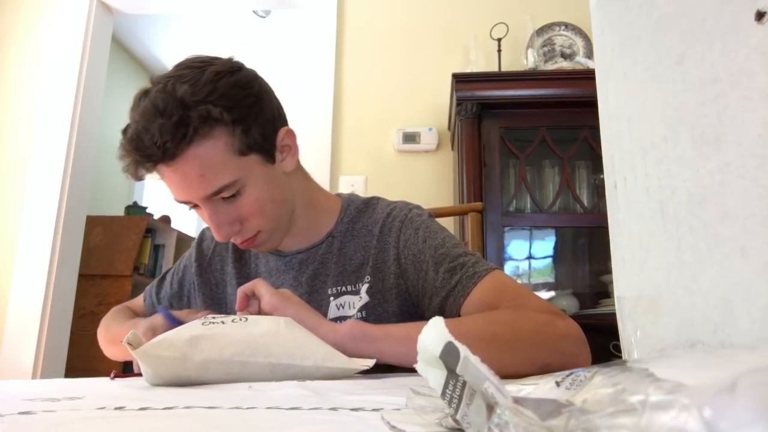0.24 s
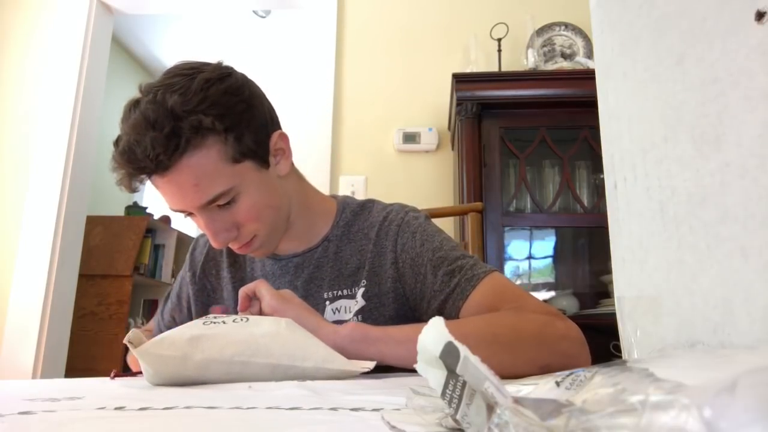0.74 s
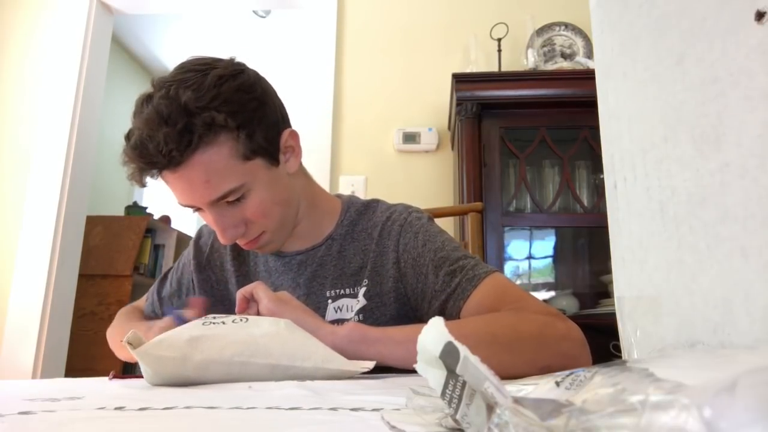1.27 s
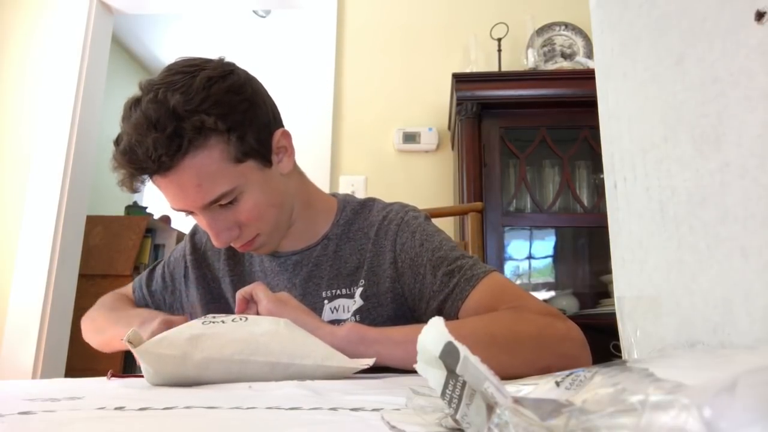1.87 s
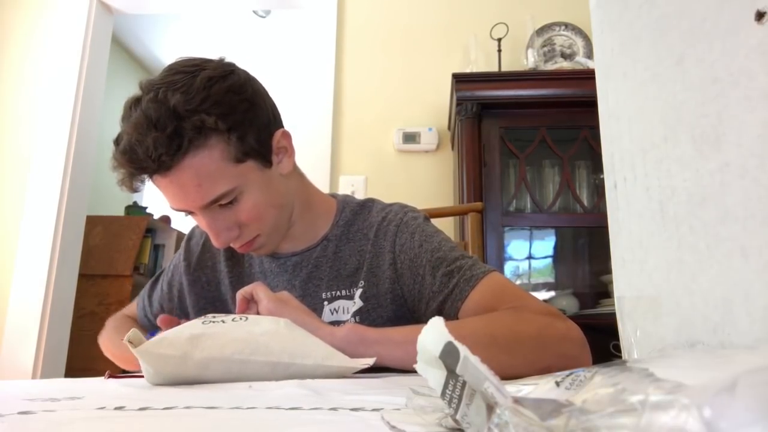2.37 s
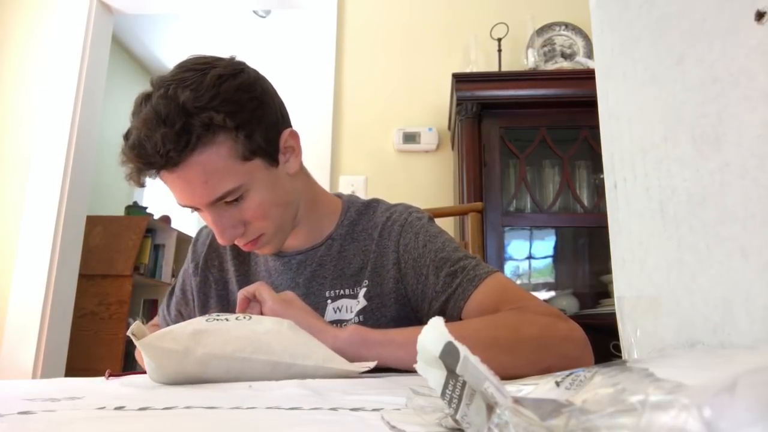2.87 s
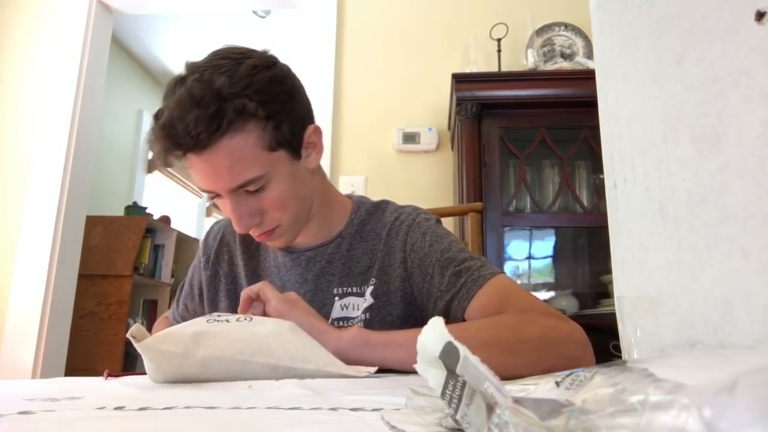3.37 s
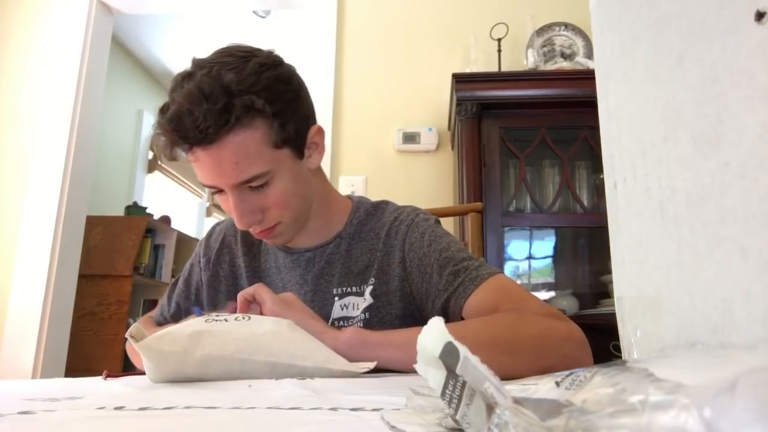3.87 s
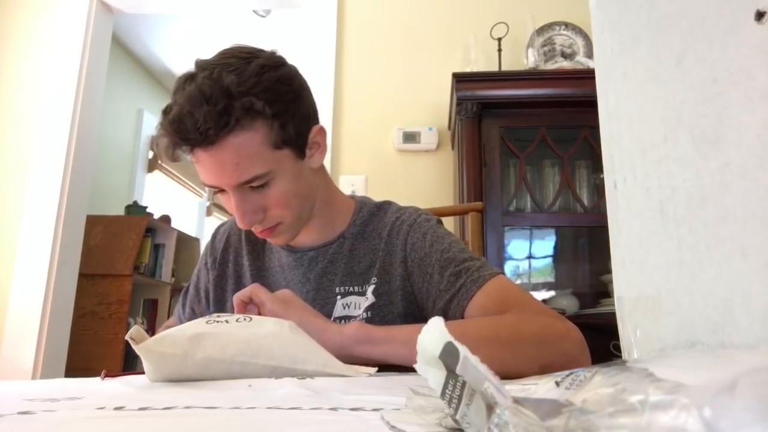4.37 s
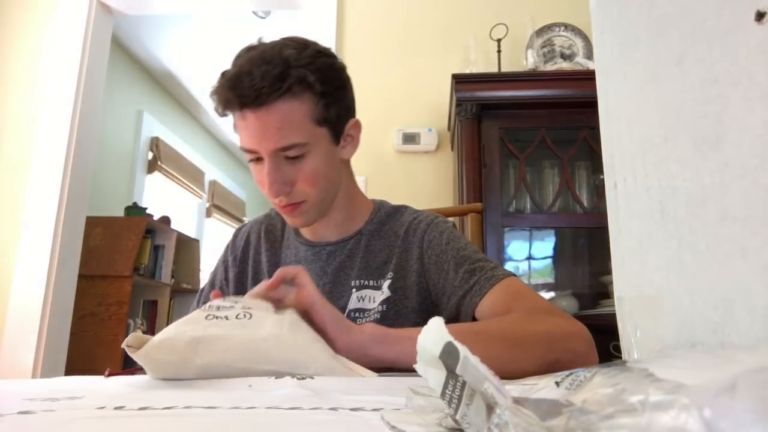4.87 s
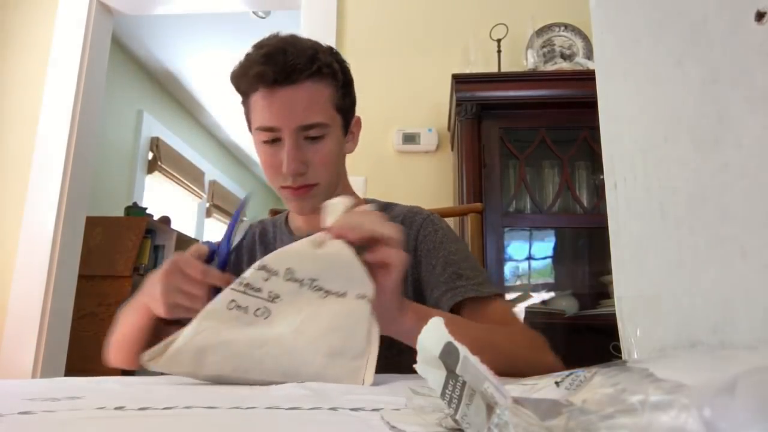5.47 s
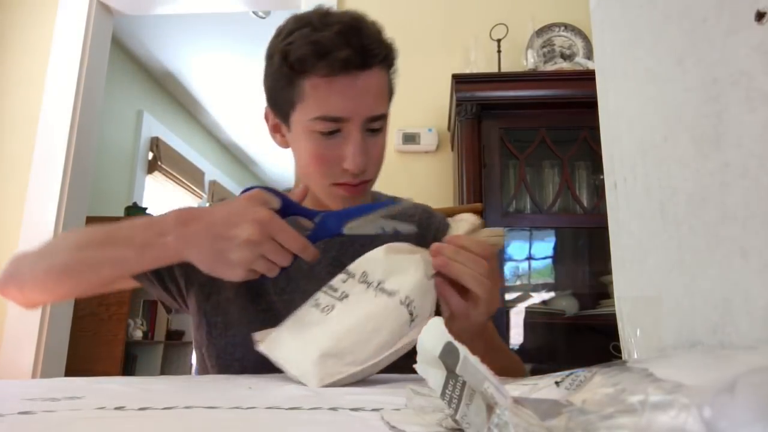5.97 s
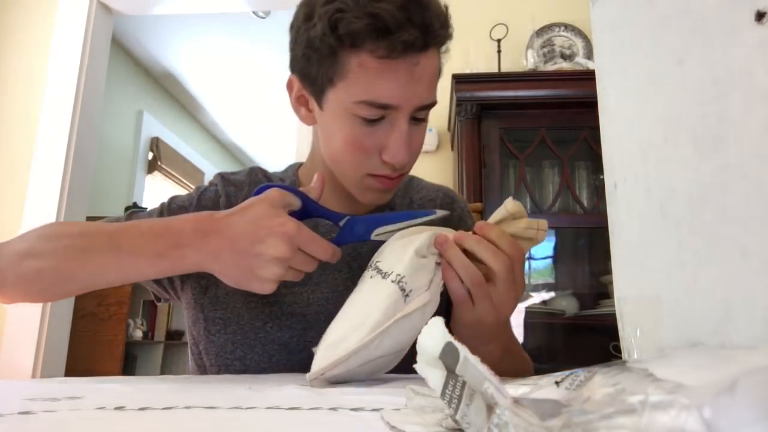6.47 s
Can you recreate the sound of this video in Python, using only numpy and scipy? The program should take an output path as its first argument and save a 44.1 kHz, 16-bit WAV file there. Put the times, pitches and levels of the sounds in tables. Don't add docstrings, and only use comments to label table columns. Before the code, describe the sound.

Close to the microphone in a small furnished room, scissors work at a plastic tie on a cloth bag. A hard knock and low thud open it, then sharp snaps, plastic handle knocks, booming table thumps and cloth scrapes come irregularly. After about five seconds the thuds give way to light blade ticks and fuller rustling as the bag is lifted. A faint steady hum continues underneath.

```python
import sys
import numpy as np
from scipy import signal
from scipy.fft import irfft
from scipy.io import wavfile

SR = 44100
rng = np.random.default_rng(int(sys.argv[2]) if len(sys.argv) > 2 else 0)


def generate_wav(signal):
    frames = np.transpose(np.atleast_2d(signal))
    scaled = np.clip(frames, -1, 1) * 32767
    pcm = np.round(scaled).astype(np.int16)
    wavfile.write(sys.argv[1], SR, pcm)


def boost(x):
    u = np.asarray(x, float) / 20
    return 10 ** u


N = 296383


def at_hz(points, hz):
    point_hz, point_db = np.transpose(points)
    return np.interp(np.log(hz), np.log(point_hz), point_db)


def rms_one(x):
    return x / np.sqrt(np.mean(x ** 2) + 1e-20)


def filtered(x, order, hz, kind):
    return signal.sosfilt(signal.butter(order, hz, kind, fs=SR, output="sos"), x)


def drift(rate):
    r = np.exp(-80 * np.pi * rate / SR)
    noise = rng.standard_normal(N // 40 + 2002)
    slow = signal.lfilter([1], [1, -2 * r, r * r], noise)[2000:]
    return np.interp(np.arange(N) / 40, np.arange(len(slow)), rms_one(slow))


def bands(pair):
    edges = 25 * 2 ** np.arange(0, 9.6, .5)
    for k, (low, high) in enumerate(zip(edges, edges[1:])):
        yield np.sqrt(low * high), filtered(pair[k % 2], 2, [low, high], "band")


def coloured(source, spectrum, patchy_db, rate):
    together = drift(rate / 2)
    out = np.zeros(N)
    for hz, band in bands(source):
        flicker_db = patchy_db * (together + drift(rate))
        out += boost(at_hz(spectrum, hz) + flicker_db) * band
    return rms_one(out)


def struck(modes, t60, rise_s, spread):
    t = np.arange(int(.3 * SR))[:, None] / SR
    hz, db = np.transpose(modes)
    strength_luck, pitch_luck, phase_luck = rng.standard_normal((3, len(hz)))
    waves = np.sin(2 * np.pi * hz * (1 + spread * pitch_luck) * t + 0.25 * phase_luck)
    rings = (boost(db + 2.03 * strength_luck) * waves).sum(axis=1)
    t = t[:, 0]
    sound = rings * boost(-60 * t / max(t60, .003)) * (1 - np.exp(-t / rise_s))
    return sound / np.abs(sound).max()


def crack(colour, length_s):
    bins, luck = np.arange(513), rng.random(33)
    late_s = length_s * np.interp(bins, bins[::16], luck)
    patchy_db = 14 * (np.interp(bins, bins[::16], luck[::-1]) - .5)
    strength = boost(at_hz(colour, np.maximum(bins, 1) * SR / 1024) + patchy_db)
    phase = 2 * np.pi * np.cumsum(late_s + .0015) * SR / 1024
    return irfft(strength * np.exp(-1j * phase))


def strokes(rows, rise_db_per_s, fall_db_per_s):
    t = np.arange(0, N + 64, 64)[:, None] / SR
    s, hold_s, *levels = np.transpose(rows)
    loss = rise_db_per_s * np.maximum(s - t, 0) + fall_db_per_s * np.maximum(t - s - hold_s, 0)
    return np.array([np.interp(np.arange(N) / SR, t[:, 0], (db - loss).max(axis=1)) for db in levels])


def add(track, s, sound):
    i = int(s * SR)
    track[i:i + len(sound)] += sound[:len(track) - i]


# pitch_hz, level_db
HOUSE_COLOUR = [(18, -37), (30, 0.5), (95, -4), (280, -4), (328, -9.5), (415, -3), (760, -12.5),
                (1010, -8.5), (1760, -17), (4300, -21.5), (4910, -21), (6720, -25), (10500, -31.5),
                (14400, -14), (16000, -44)]
# pitch_hz, width_hz, level_db
AIR_DUCTS = [
    (104, 11, -70),
    (184, 2.9, -71.5),
    (244, 7.9, -77.5),
    (332, 2.5, -68),
    (990, 210, -72.5),
]


def house():
    hum_db = -63.5
    out = boost(hum_db) * coloured(rng.standard_normal((2, N)), HOUSE_COLOUR, patchy_db=0.4, rate=1)
    for hz, width_hz, db in AIR_DUCTS:
        r = np.exp(-np.pi * width_hz / SR)
        resonance = [1, -2 * r * np.cos(2 * np.pi * hz / SR), r * r]
        out += boost(db) * rms_one(signal.lfilter([1, 0, -1], resonance, rng.standard_normal(N)))
    return out


# pitch_hz, level_db (per Hz)
RUSTLE_COLOUR = [(290, -6), (500, -16), (795, -3), (960, -2.5), (1790, -4), (2540, -5.5), (6140, -9.5),
                 (10400, -17), (13600, -7), (16000, -21.5)]
# start_s, hold_s, rustle_db, sheen_db (above 6 kHz)
CLOTH_PLUCKS = [(0.14, 0.11, -66, -76), (0.424, 0.0066, -66.5, -92), (0.5, 0.15, -74, -98),
                (0.69, 0.0034, -64.5, -83), (0.76, 0.016, -66, -83), (1.02, .06, -73, -82),
                (1.222, 0.024, -73, -79), (1.55, 0.016, -67.5, -75), (1.716, 0.073, -72, -89),
                (2.544, 0.0038, -66, -75), (3.42, 0.077, -75, -85), (3.78, .11, -68, -79.5),
                (3.966, 0.031, -68, -81), (4.08, .005, -70, -79), (4.17, 0.017, -71, -74),
                (4.36, .02, -85, -79), (4.62, .02, -63.5, -72.5), (5.77, .005, -66, -62.5),
                (5.81, 0.019, -58, -70), (5.99, .005, -63, -70), (6.07, 0.035, -62, -68),
                (6.38, 0.0096, -62.5, -69), (6.47, 0.024, -61.5, -68)]
# time_s, effort_db
BAG_LIFTING = [
    (4.5, -99),
    (4.64, -69),
    (5.14, -65.5),
    (5.24, -60),
    (5.67, -59.5),
    (5.88, -65),
    (5.98, -66.5),
    (6.21, -65),
    (6.72, -68),
]


def cloth_rustle():
    chance = rng.random((2, N))
    grains_per_s = 4500 * boost(4.5 * drift(40))
    slips = chance < grains_per_s / SR
    grains = slips * rng.standard_normal((2, N))
    grains *= boost(1.44 * np.minimum(rng.exponential(1, (2, N)), 5))
    fibres = coloured(grains + 1e-18, RUSTLE_COLOUR, patchy_db=2.0, rate=16.4)
    lift_db = np.interp(np.arange(N) / SR, *np.transpose(BAG_LIFTING))
    pluck_db = strokes(CLOTH_PLUCKS, rise_db_per_s=380, fall_db_per_s=346)
    body_gain, sheen_gain = boost(np.maximum(pluck_db, [lift_db, lift_db - 8]))
    body = rms_one(filtered(fibres, 3, 6000, "low"))
    sheen = rms_one(filtered(fibres, 3, 6000, "high"))
    return body_gain * body + sheen_gain * sheen


# pitch_hz, level_db (per Hz)
SCRAPE_COLOUR = [(76, -16), (130, 2), (289, -4), (325, 0.5), (723, -16.5), (1220, -11.5), (2000, -31),
                 (2600, -70), (4400, -120)]
# pitch_hz, level_db (per Hz)
RUMBLE_COLOUR = [(30, -43), (50, 18.5), (90, 9), (125, 6), (200, -35.5)]
# start_s, hold_s, rumble_db, scrape_db
BAG_DRAGS = [(0.4, 0.009, -69, -73), (0.56, 0.074, -67, -72), (0.9, 0.098, -62, -59),
             (1.06, 0.027, -67, -46.5), (1.2, 0.1, -58, -53), (1.5, 0.0068, -61, -48.5),
             (1.6, .01, -64, -70), (1.7, 0.21, -61.5, -64), (2.19, 0.028, -54, -43.5),
             (2.45, 0.0078, -55, -87), (2.72, .01, -59.5, -90), (2.846, 0.0076, -55.5, -84),
             (3.0, 0.15, -60, -60.5), (3.3, .06, -59.5, -65.5), (3.45, .04, -57, -52),
             (3.68, 0.016, -63, -59), (3.88, 0.12, -64, -55.5), (4.15, 0.041, -57, -63),
             (4.33, 0.0081, -59, -75), (4.55, 0.022, -57, -62), (4.69, 0.0089, -66, -68),
             (4.866, .01, -70, -66), (5.0, 0.0055, -60.5, -59), (5.53, 0.0082, -67, -53),
             (5.632, 0.06, -70, -72), (5.818, 0.019, -77, -55), (6.11, 0.0088, -71, -59),
             (6.24, .01, -63, -77), (6.45, 0.015, -78, -53.5), (6.7, .02, -59, -58.5)]


def bag_rub():
    lean = (0.82, 4.1, -66, -99)
    rumble_gain, scrape_gain = boost(strokes(BAG_DRAGS + [lean], rise_db_per_s=178, fall_db_per_s=173))
    scrape = coloured(rng.standard_normal((2, N)), SCRAPE_COLOUR, patchy_db=5.5, rate=22.7)
    rumble = coloured(rng.standard_normal((2, N)), RUMBLE_COLOUR, patchy_db=2, rate=6)
    return scrape_gain * scrape + rumble_gain * rumble


# start_s, peak_db, deep_pitch_hz, panel_db, panel_pitch_hz (strongest)
TABLE_THUDS = [(0.03, -31.5, 114, -31.5, 244), (0.061, -40.5, 111.5, -38, 262),
               (0.318, -43, 73.6, -45.5, 263), (1.077, -27, 85.4, -32, 158), (1.103, -26.5, 75, -27.5, 249),
               (1.159, -36, 68, -40, 249), (1.376, -34, 96, -35.5, 156), (1.449, -55, 53, -56, 164),
               (1.684, -62, 45.8, -47, 336), (2.223, -35, 97.6, -29, 513), (2.985, -60, 87.5, -52.5, 156),
               (3.144, -20, 106, -26.5, 200), (3.178, -33.5, 63, -37, 216), (3.222, -44, 81, -43.5, 148.5),
               (3.561, -49, 89, -43, 131), (4.006, -42, 106, -33, 157), (4.096, -45, 90, -39, 244),
               (4.341, -29, 93, -50.5, 132), (4.438, -44, 45.8, -38.5, 278), (4.89, -43.5, 109, -40, 139)]
# start_s, peak_db, deep_pitch_hz
FOREARM_NUDGES = [
    (0.928, -46.5, 95.5),
    (1.838, -50, 93),
    (2.852, -51.5, 94.4),
    (3.348, -47.5, 95),
    (3.436, -46, 110.4),
    (4.678, -50, 112.4),
    (5.796, -52, 109.7),
]
# pitch_hz, level_db
PANEL_MODES = [(142, 2.5), (190, 3), (232, 1), (296, 1), (362, 0.5), (480, -6)]


def table():
    out = np.zeros(N)
    nudges = [(s, db, hz, db - 6, 218) for s, db, hz in FOREARM_NUDGES]
    for s, db, hz, panel_db, panel_hz in sorted(TABLE_THUDS + nudges):
        t60 = 0.1 * boost(-0.48 * (db + 36))
        boom = [(hz, 0), (55, -4), (hz * 0.768, -6)]
        add(out, s, boost(db + 1.0) * struck(boom, 1.64 * t60, rise_s=0.0069, spread=0))
        panels = PANEL_MODES + [(panel_hz, 3.5)]
        add(out, s, boost(panel_db + 2.5) * struck(panels, t60, rise_s=0.0051, spread=0.015))
    return out


# start_s, peak_db, pitch_hz (strongest), upper_db (higher modes)
HANDLE_KNOCKS = [(0.028, -38, 935, -35), (0.0632, -39, 900, -41.5), (0.32, -50.5, 1002, -57.5),
                 (1.073, -46.5, 955, -54.5), (1.102, -45, 575, -58), (1.22, -60, 680, -63),
                 (1.314, -50.5, 953, -62), (1.3705, -40.5, 997, -43), (1.49, -57.5, 697, -54.5),
                 (2.221, -27, 891, -28), (2.567, -74, 786, -58), (2.989, -54, 600, -57.5),
                 (3.095, -54, 615, -60.5), (3.143, -46.5, 944, -47), (3.405, -79, 980, -61),
                 (3.561, -44.5, 942, -52.5), (4.005, -42.5, 596, -60), (4.098, -42.5, 922, -44),
                 (4.44, -45.5, 870, -51.5), (4.89, -56, 1213, -65), (5.805, -57, 864, -68)]
# pitch_hz, level_db
HANDLE_MODES = [(1281, -6.5), (1609, -9), (1940, -12.5), (1396, -26), (1750, -13.5), (2365, -15)]


def handles():
    out = np.zeros(N)
    t60 = 0.048
    crack_colour = [(500, 2), (1200, 40.5), (2300, 27.5), (4500, -16), (9000, -53)]  # (Hz, dB)
    for s, db, hz, upper_db in HANDLE_KNOCKS:
        contact_s = 1.6 / hz
        body = [(hz, 0), (hz * 0.706, -4), (hz * 1.217, -6), (hz * 0.642, -7)]
        add(out, s, boost(db + 6.0) * struck(body, t60, contact_s, spread=0))
        add(out, s, boost(upper_db + 4.0) * struck(HANDLE_MODES, 0.86 * t60, 0.73 * contact_s, spread=0.028))
        add(out, s - .001, boost(upper_db) * crack(crack_colour, length_s=0.001))
    return out


# start_s, level_db, lowest_hz, highest_hz, t60_s (time to fall 60 dB)
BLADE_CHATTER = [(0.017, -57, 900, 1700, .3), (0.781, -67, 2000, 6000, .15), (1.33, -58, 2300, 2800, .2),
                 (1.378, -52, 8000, 14500, .2), (1.377, -48, 3350, 3650, .5), (1.378, -51, 6300, 7000, .3),
                 (1.376, -52, 1800, 2700, .3), (1.376, -52, 420, 680, .3), (2.212, -58, 1000, 3000, .2),
                 (2.225, -46, 2500, 4560, .32), (2.226, -44, 600, 950, .2), (2.571, -62, 900, 4600, 0.22),
                 (3.147, -68, 2800, 4600, .2), (3.563, -65, 5200, 10500, .2), (4.087, -61, 1000, 1600, .2),
                 (5.805, -56, 1200, 4100, .2), (2.224, -43, 1750, 2600, .25), (1.064, -47, 350, 750, .12),
                 (4.0985, -52, 1800, 3300, .06), (5.305, -58, 2000, 7500, .1), (5.24, -58, 2300, 4200, .06),
                 (3.17, -44, 220, 330, .25)]


def chatter():
    out = np.zeros(N)
    t = np.arange(int(.3 * SR)) / SR
    touches_per_s = 6000
    for s, db, low_hz, high_hz, t60 in BLADE_CHATTER:
        touches = (rng.random(len(t)) < touches_per_s / SR) * rng.standard_normal(len(t))
        rung = filtered(touches + 1e-18, 4, [low_hz, high_hz], "band")
        add(out, s, boost(db - 60 * t / t60) * rms_one(rung))
    return out


# start_s, level_db, top_treble_db
BLADE_TICKS = [(0.6855, -64, -70), (0.7524, -67, -84), (1.2232, -62, -71), (1.25, -61, -68),
               (1.721, -60.5, -76), (1.85, -67, -80), (2.0083, -82, -82), (2.644, -58, -72),
               (2.9891, -75, -73), (3.405, -58.5, -74), (3.47, -64, -78), (3.694, -61, -69),
               (3.8293, -61, -79), (4.2032, -59.5, -69), (4.4423, -75, -82), (4.7316, -70, -89),
               (4.9261, -55.5, -66), (5.241, -53.5, -65), (5.314, -58, -68), (5.4183, -56, -60),
               (4.9934, -58, -68), (5.1782, -60, -71), (5.3786, -58, -68), (5.7694, -57.5, -67),
               (5.935, -63, -70), (6.1575, -62, -71), (6.4573, -63, -70), (6.4755, -57.5, -68),
               (5.9894, -57, -68), (6.041, -59, -67)]
# start_s, ring_db, ring_pitch_hz, crack_db, top_treble_db
BLADE_SNAPS = [(0.029, -33, 2100, -64, -66), (0.0635, -51, 2320, -62, -62.5),
               (0.7786, -40, 2820, -45.5, -70), (1.0714, -43, 2430, -61, -69),
               (1.103, -52, 2640, -55.5, -74), (1.3128, -29.5, 2560, -49, -44),
               (1.3709, -24, 3470, -33, -30), (2.2214, -26.5, 2590, -49.5, -48.5),
               (2.5678, -40.5, 2330, -55, -73), (3.143, -47.5, 2400, -78, -90),
               (3.5593, -41.5, 2550, -47.5, -48), (4.0985, -46.5, 2400, -76, -90),
               (5.8054, -57, 2600, -72, -84)]
CRACK_PITCHES = [2700, 4200, 7000, 12000]
# start_s, pitch_hz, peak_db, t60_s
# (time to fall 60 dB)
FREE_RINGS = [(1.3712, 6780, -24, 0.006), (1.3714, 13200, -27, 0.004), (1.3722, 3660, -42, 0.0075),
              (3.56, 9500, -56, 0.03), (3.5596, 4500, -45.5, .004), (3.1435, 1540, -38, .005),
              (2.644, 1500, -52, .005), (2.644, 4400, -57, .005), (2.8, 6300, -54, .004),
              (1.3126, 3700, -45, .005), (1.3126, 8800, -46, .006), (0.779, 4300, -43, .006),
              (1.3126, 5500, -39.5, 0.008), (2.2216, 4600, -29.5, 0.0021), (2.2225, 3800, -33.5, 0.0054),
              (5.427, 14000, -53, .005), (2.568, 3270, -42.5, 0.0077), (2.5682, 5700, -45, 0.0064),
              (0.032, 1580, -29.5, 0.0065), (4.0988, 1390, -31.5, 0.0052)]


def blades():
    rings, cracks = np.zeros((2, N))
    ticks = [(s, db - 2.5, 2600, db, top_db) for s, db, top_db in BLADE_TICKS]
    for s, db, hz, low_db, top_db in sorted(BLADE_SNAPS + ticks):
        add(rings, s, boost(db + 0.5) * struck([(hz, 0)], t60=0.011, rise_s=0.00042, spread=0))
        middle_db = low_db + 0.48 * (top_db - low_db)
        levels = [db + 24.5, low_db + 31.0, middle_db + 27, top_db + 23.0]
        colour = [(700, db - 8), (1700, db + 17), *zip(CRACK_PITCHES, levels)]
        add(cracks, s - .001, crack(colour, length_s=.001))
    for s, hz, db, t60 in FREE_RINGS:
        add(rings, s, boost(db + 0.5) * struck([(hz, 0)], t60, rise_s=0.0005, spread=0))
    return rings, cracks


# pitch_hz, t60_s (time to fall 60 dB)
ROOM_DECAY = [(60, .25), (250, .3), (1000, .33), (4000, .38), (7000, .32), (13000, .26)]
# pitch_hz, level_db
ROOM_STRENGTH = [(70, -8), (250, 2), (1500, -4), (4000, -3), (8000, 2.5), (14000, 0)]


def room(x):
    t = np.arange(int(.6 * SR)) / SR
    response = np.zeros(len(t))
    for hz, band in bands(rng.standard_normal((2, len(t)))):
        t60 = at_hz(ROOM_DECAY, hz)
        even_energy = np.sqrt(np.log(1e6) / t60 / SR)
        response += band * boost(at_hz(ROOM_STRENGTH, hz) - 60 * t / t60) * even_energy
    response *= np.clip((t - .005) / .004, .3, 1)
    echo_s, echo_db, echo_hz = .0072, -4.5, 5500
    echo = boost(echo_db) * (np.arange(len(t)) == int(echo_s * SR))
    response += signal.lfilter(*signal.butter(2, echo_hz, "high", fs=SR), echo)
    response[0] = 1
    return signal.fftconvolve(x, response)[:N]


def scene():
    rustle, rub = cloth_rustle(), bag_rub()
    knocks, thuds = handles(), table()
    rings, cracks = blades()
    ring_share = .35
    airborne = room(cracks + ring_share * rings + 0.8 * knocks + 0.63 * thuds + 1.043 * rustle)
    direct = (1 - ring_share) * rings + 0.14 * knocks + 0.28 * thuds
    return (airborne + direct + rub + house() + chatter())[None]


def roll_off(x):
    return signal.sosfilt(signal.butter(12, 16850, fs=SR, output="sos"), x)


# pitch_hz, width_hz, depth (0 to 1)
MIC_DIPS = [
    (4940, 380, 0.35),
    (10470, 2200, 0.34),
]


def record(dry):
    x = filtered(dry, 6, 49, "high")
    for hz, width_hz, depth in MIC_DIPS:
        x = x - depth * signal.lfilter(*signal.iirpeak(hz, hz / width_hz, fs=SR), x)
    mix = signal.sosfilt(signal.cheby2(12, 60, 16250, fs=SR, output="sos"), x)
    return roll_off(mix)


dry = scene()
out = record(dry)
generate_wav(out)
```